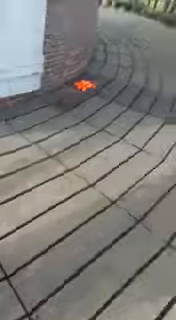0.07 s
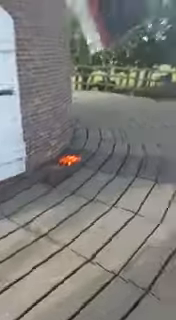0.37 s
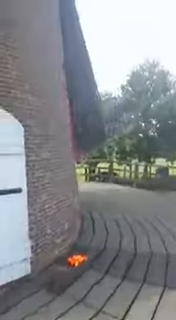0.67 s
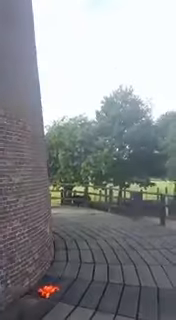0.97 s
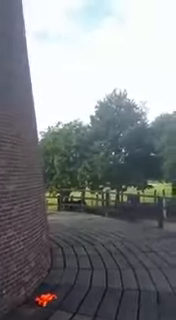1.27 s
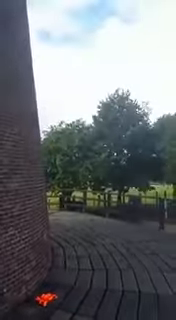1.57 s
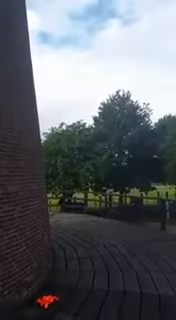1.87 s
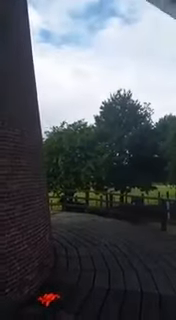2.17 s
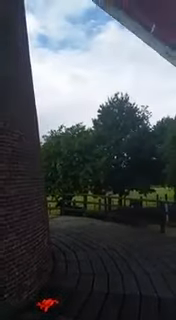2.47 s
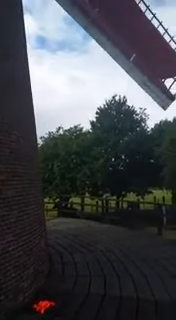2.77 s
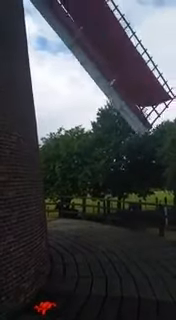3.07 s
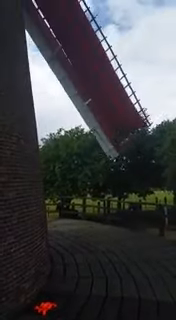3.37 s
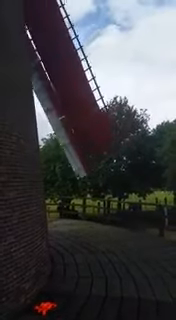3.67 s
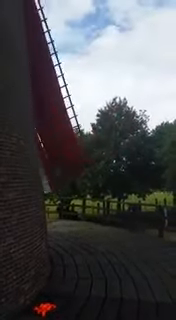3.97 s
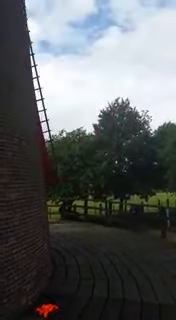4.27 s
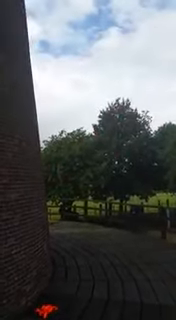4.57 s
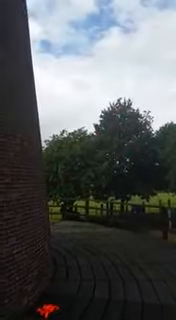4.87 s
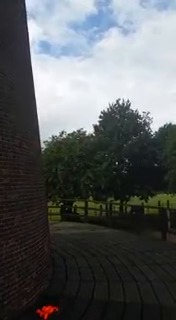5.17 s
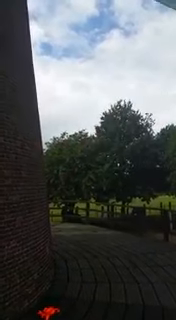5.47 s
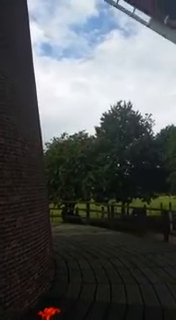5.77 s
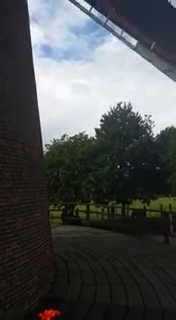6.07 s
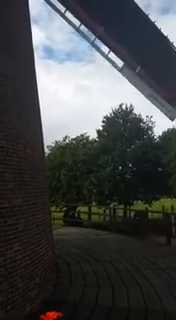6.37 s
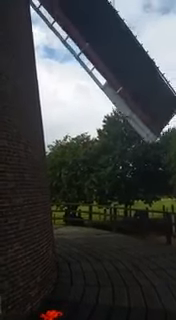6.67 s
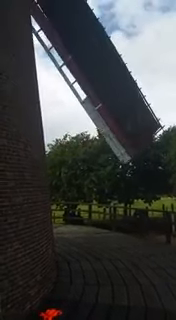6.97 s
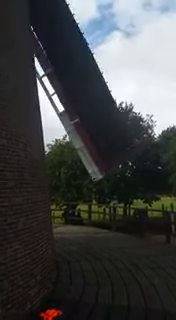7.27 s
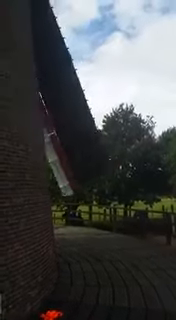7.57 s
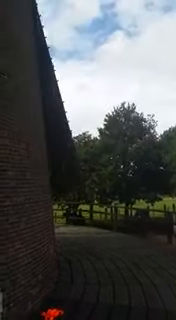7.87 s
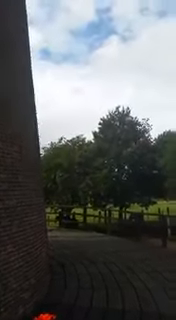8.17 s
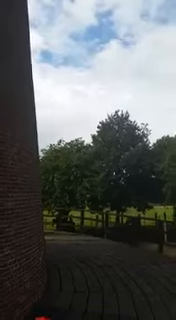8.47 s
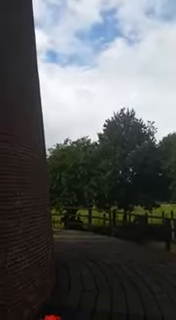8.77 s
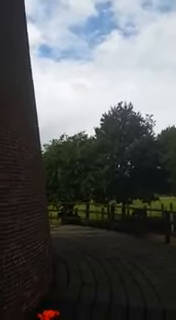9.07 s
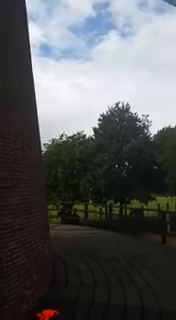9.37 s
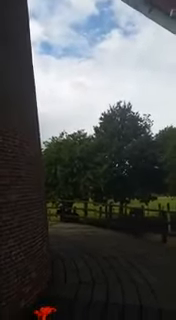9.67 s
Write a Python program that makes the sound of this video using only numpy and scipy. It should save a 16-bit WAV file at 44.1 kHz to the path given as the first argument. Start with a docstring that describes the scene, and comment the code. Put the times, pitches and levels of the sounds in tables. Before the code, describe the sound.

After a brief silence, fingers rub, tick and thump on the left of a phone microphone at about 0.5 seconds, and outdoor wind starts. By 2 seconds it has built into a steady, pattering low rumble with a throbbing hum, a higher fluttering whirr and a thin hiss. Dull knocks and tiny creaks are scattered throughout, with a sharp, close thump near 2.9 seconds. Very faint, high insect-like trills come and go toward the right. A windmill sail pushes a deep swell of air past at about 3.8 seconds and again at 7.3, and soft low booms swell between 3.5 and 5 seconds. From 8.2 seconds the fingers return, loudly thumping, rubbing and scraping right on the microphone, mostly on the left, with small ticks and heavier low gusts until the end, just before 10 seconds.

```python
"""Beside a turning windmill, a phone held in the hand, two microphone ports open to the wind.
After a moment of silence fingers rub, tick and thump at the left port; dull knocks, faint high chirps
and brief narrow rings come and go. By 2 s the buffeting has built to a pattering rumble that hums in the
case, with a higher whirr, low gusts and a thin hiss. Near 3.8 s and 7.3 s a sail pushes a deep swell
of air past. From 8.2 s the fingers are back, thumping, rubbing and scraping right on the microphone."""
import sys
import numpy as np
from scipy import signal
from scipy.fft import rfft, irfft
from scipy.io import wavfile
from scipy.ndimage import uniform_filter1d

SR = 44100
rng = np.random.default_rng(int(sys.argv[2]) if len(sys.argv) > 2 else 0)


def materialize(psi):
    """Save the field psi as 16-bit PCM at rate SR to the path in sys.argv[1].

    A 1-D psi becomes a single channel; in a 2-D psi each row is a channel.
    """
    bounded = np.clip(np.atleast_2d(psi).T, -1, 1)
    quanta = np.round(bounded * 32767).astype(np.int16)
    wavfile.write(sys.argv[1], SR, quanta)


N = 428652
TIME = np.arange(N) / SR
FULL_WIND_DB = -29  # usual strength of the buffeting


def undb(db):
    """Decibels to gain."""
    return 10 ** (np.asarray(db) / 20)


def unit(x):
    """Scale to rms 1."""
    return x / np.sqrt(np.mean(x ** 2))


def bell(s, half_s):
    """A smooth swell that peaks at 1 at time s."""
    return np.exp(-((TIME - s) / half_s) ** 2)


def sides(pan_db):
    """Gains at the two microphones; pan is left minus right."""
    return undb([[min(pan_db, 0)], [min(-pan_db, 0)]])


def add(out, s, sound, pan_db):
    """Mix a sound in at time s."""
    start = int(s * SR)
    part = sound[:max(N - start, 0)]
    out[:, start:start + len(part)] += sides(pan_db) * part


def across(points, hz):
    """Read (f/Hz, value) points on a log-frequency axis."""
    f, value = np.transpose(points)
    return np.interp(np.log(hz + 1), np.log(f), value)


def colour(x, points, resonances=(), size=16384):
    """Minimum-phase filter: a smooth spectrum with ringing resonances on top."""
    hz = np.arange(size // 2 + 1) * SR / size
    peaks_db = sum(lift / (1 + (2 * (hz - f) / width) ** 2) for f, width, lift in resonances)
    cepstrum = irfft(np.log(undb(across(points, hz) + peaks_db)))
    cepstrum[1:size // 2] *= 2
    cepstrum[size // 2:] = 0
    response = irfft(np.exp(rfft(cepstrum)))[:size // 2]
    return signal.oaconvolve(x, response)[:len(x)]


def band(x, hz, width_hz):
    """Two-pole resonance."""
    return signal.lfilter(*signal.iirpeak(hz, hz / min(width_hz, SR / 4), fs=SR), x)


def shelf(x, db, corner_hz):
    """Shift everything above the corner by db."""
    low = signal.sosfiltfilt(signal.butter(2, corner_hz, fs=SR, output="sos"), x)
    return low + undb(db) * (x - low)


def walk(rate):
    """Random levels held 1 / rate s and smoothed twice; rms near 1."""
    hold = int(SR / rate)
    steps = np.repeat(rng.standard_normal(N // hold + 1), hold)
    return unit(uniform_filter1d(uniform_filter1d(steps, hold), hold)[:N])


def grains(rate, spread_db):
    """Random clicks, rate a second, of uneven size; rms 1."""
    size = undb(spread_db * np.minimum(rng.exponential(size=N), 4))
    return unit((rng.random(N) < rate / SR) * size * rng.standard_normal(N))


def ringing(hz, width_hz):
    """Noise in a steep resonance; rms 1."""
    return unit(band(band(rng.standard_normal(N), hz, width_hz), hz, width_hz))


def swell(length_s, hz, width_hz):
    """Resonant noise that rises and falls once."""
    shape = signal.windows.cosine(int(length_s * SR))
    return unit(ringing(hz, width_hz)[:len(shape)]) * shape


def pulsing(rate_hz, unevenness, depth_db):
    """A gain that pulses at an uneven rate; rms 1."""
    phase = 2 * np.pi * np.cumsum(rate_hz * (1 + unevenness * walk(rate=30))) / SR
    return unit(undb(depth_db * np.sin(phase)))


# buffeting at the phone: t/s, level/dB
WIND_STRENGTH = [(.38, -59), (.46, -64), (.51, -45.5), (.64, -43), (1.28, -40.5), (1.43, -37),
                 (1.62, -31.5), (1.82, -29.5), (4.4, -28), (7.3, -29.5), (8.5, -28.5), (9.72, -28.5)]


def wind_strength():
    """The wind rises, then holds; this one level in dB drives all its layers."""
    return np.interp(TIME, *np.transpose(WIND_STRENGTH))


# wind on the body of the phone: f/Hz, level/dB
RUMBLE_SPECTRUM = [(15, -41.5), (40, -12.5), (70, -4.5), (100, 0), (200, -2.5), (280, -5), (400, -9),
                   (500, -14.5), (640, -21.5), (1000, -25.5), (1600, -35), (2400, -40.5), (3500, -46.5),
                   (6000, -65.5)]
# resonances of the case in the hand: f/Hz, width/Hz, lift/dB
CASE_MODES = [(89, 12, 6), (145, 20, 1.5), (182, 8.4, 6), (210, 12, 3.5), (318, 40, 3), (403, 18, 4),
              (744, 97, 7.5), (997, 40, 7), (1160, 45, 2.5), (1243, 55, 8.5), (1722, 90, 7)]
# likeness of the rumble at the two microphones: f/Hz, correlation
PORT_CORRELATION = [(40, 0.98), (90, 1), (170, 0.99), (240, 0.63), (330, 0.92), (430, 0.58), (600, 0.43),
                    (800, 0.2), (1000, -0.21), (1350, -0.78), (1600, -0.33), (2000, 0.0035)]


def rumble(strength_db, patter=0.43):
    """Eddies and tiny taps shake the case: low notes move both ports together, higher ones rock it."""
    flutter, flurry = undb(0.82 * walk(rate=15)), undb(2 * walk(rate=12))
    likeness = np.clip(across(PORT_CORRELATION, np.arange(N // 2 + 1) * SR / N), -1, 1)
    motions = []
    for sign in (1, -1):
        push = flutter * rng.standard_normal(N) + patter * flurry * grains(rate=350, spread_db=2.5)
        share = irfft(rfft(push) * np.sqrt(1 + sign * likeness), N)
        motions.append(colour(share, RUMBLE_SPECTRUM, CASE_MODES))
    together, rocking = motions
    shaking = unit(np.array([together + rocking, together - rocking])) * undb(strength_db)
    # a light wind carries fewer small eddies, so it sounds duller
    return shelf(shaking, np.minimum(strength_db - FULL_WIND_DB, 0), corner_hz=1250)


# two close modes of the case: f/Hz, width/Hz, level/dB
HUMMING_MODES = [(325.1, 18.2, -1.5), (348.9, 25.5, -4.5)]
# throbs and lulls of the hum: peak t/s, half-length/s, lift/dB
HUM_THROBS = [(0.573, 0.036, -11), (1.494, 0.15, 4.5), (2, 0.029, 8.5), (2.16, 0.05, -5),
              (2.277, 0.036, 3.5), (2.54, 0.054, 5.5), (2.794, 0.031, 4.5), (3.328, 0.03, -7),
              (3.616, 0.027, 7.5), (4.026, 0.027, -9), (4.17, 0.08, 6.5), (4.62, 0.087, 5),
              (5.033, 0.019, 4.5), (5.4, 0.044, 8), (5.518, 0.09, 4), (5.718, 0.08, 6.5), (6.04, 0.024, -7),
              (6.187, 0.03, 8), (6.507, 0.023, -11), (7.067, 0.039, 3), (7.7, 0.32, -3.5),
              (8.175, 0.033, -10), (9.21, 0.049, 3.5)]


def hum(strength_db, wander_hz=3, calm_db=-27, rocking_db=-13, pan_db=-1.5):
    """The case hums, fluttering and throbbing: a firm tone in light wind, two noisy modes as it grows."""
    ring, rocking = (unit(sum(undb(db) * ringing(hz, width) for hz, width, db in HUMMING_MODES))
                     for _ in range(2))
    pitch_hz = HUMMING_MODES[0][0] + wander_hz * walk(rate=9)
    tone = unit(np.sin(2 * np.pi * np.cumsum(pitch_hz) / SR))
    excess_db = strength_db - FULL_WIND_DB
    ring_gain = undb(-7 + 1.15 * excess_db)
    tone_gain = np.hypot(undb(calm_db), undb(-8 + 0.91 * excess_db))
    together = ring_gain * ring + tone_gain * tone
    # the wind sets the slow swells, while the quick beating stays random
    together *= np.hypot(ring_gain, tone_gain) / np.sqrt(uniform_filter1d(together ** 2, SR // 6))
    together *= pulsing(rate_hz=9, unevenness=0.398, depth_db=0.8)
    throb_db = sum(db * bell(s, half_s) for s, half_s, db in HUM_THROBS) + 0.5 * walk(rate=16)
    opposite = np.array([[1], [-1]])
    apart = opposite * undb(rocking_db) * ring_gain * rocking
    return (together + apart) * undb(FULL_WIND_DB + throb_db + opposite * pan_db / 2)


def whirr(strength_db, wander_hz=11, gain_db=-22, growth=1.45):
    """A higher whirr grows with the buffeting, fluttering unevenly while its pitch wanders."""
    drift = np.exp(2j * np.pi * np.cumsum(wander_hz * walk(rate=10)) / SR)
    note = np.real(signal.hilbert(ringing(hz=750, width_hz=32)) * drift)
    level_db = FULL_WIND_DB + growth * (strength_db - FULL_WIND_DB) + gain_db + 2.5 * walk(rate=7.2)
    flutter = pulsing(rate_hz=14, unevenness=0.35, depth_db=4.5)
    return sides(pan_db=1) * note * flutter * undb(level_db)


# swirling air right at the ports: f/Hz, level/dB
EDDY_SPECTRUM = [(10, -17), (25, -12.5), (45, -0.5), (80, 0), (140, -8), (300, -20), (1000, -75)]
# low gusts on the microphones: peak t/s, half-length/s, level/dB, pan/dB
PORT_GUSTS = [(0.618, 0.097, -37.5, 22), (1.06, 0.25, -33.5, -18), (1.483, .14, -33.5, 13),
              (2.25, .25, -41, 0.5), (2.93, .2, -38, 13), (5.87, 0.1, -39.5, -10), (7.354, 0.17, -29, -12),
              (7.75, 0.2, -34, 1.5), (8.36, 0.24, -25, -1.5), (8.867, 0.29, -26.5, -3),
              (9.6, 0.54, -26.5, 12)]


def eddies(strength_db, steady_db=-21, flutter_db=2):
    """Slow swirls push on each port separately: weakly with the buffeting, strongly in each gust."""
    swirls = [colour(rng.standard_normal(N), EDDY_SPECTRUM) * undb(flutter_db * walk(rate=7.8))
              for _ in range(2)]
    gusts = sum(undb(db) * sides(pan_db) * bell(s, half_s) for s, half_s, db, pan_db in PORT_GUSTS)
    return unit(np.array(swirls)) * np.hypot(undb(strength_db + steady_db), gusts)


def sails(strength_db, pass_s=3.84, period_s=3.47, gain_db=-4):
    """Each sail pushes a deep swell as it sweeps down to the tower; the first is lost in the fade-in."""
    passes = sum(bell(pass_s + k * period_s, half_s=0.28) for k in (-1, 0, 1))
    return ringing(hz=95, width_hz=90) * passes * undb(strength_db + gain_db)


# air across the microphone ports: f/Hz, level/dB
HISS_SPECTRUM = [(800, -19.5), (2000, 5.5), (3000, 5.5), (4400, 7), (5400, -5.5), (7200, -7), (9000, -12),
                 (10500, 1), (13000, 1.5), (16000, 0)]
# resonances of each port: f/Hz, width/Hz, lift/dB
LEFT_PORT_MODES = [(3826, 1280, 20.5), (11900, 1500, 1)]
RIGHT_PORT_MODES = [(4300, 2400, 6.5), (11470, 2300, 11.7)]
# surges of the treble: peak t/s, half-length/s, lift at the right microphone/dB
HISS_SURGES = [(0.576, 0.09, 32), (1.65, 0.018, 7.5), (1.778, 0.017, 7.5), (2.161, 0.018, 12),
               (3.044, 0.018, 11), (3.1, 0.02, 7), (3.42, 0.016, 5), (4.655, 0.023, 5.5), (5.12, .04, 4.5),
               (5.45, 0.049, 9), (6.06, 0.0099, 6), (6.27, 0.025, 6), (8.497, 0.37, 3)]


def hiss(strength_db, lower_db=-58, treble_db=-55, hold_above_db=-32, left_share=0.35):
    """Wind sounds each port's resonances: the lower grow with it; the treble sets in steeply, surging."""
    ports = unit(np.array([colour(rng.standard_normal(N), HISS_SPECTRUM, modes)
                           for modes in (LEFT_PORT_MODES, RIGHT_PORT_MODES)]))
    lower = signal.sosfiltfilt(signal.butter(6, 5200, fs=SR, output="sos"), ports)
    onset_db = 3.5 * np.minimum(strength_db - hold_above_db, 0)
    surge_db = sum(db * bell(s, half_s) for s, half_s, db in HISS_SURGES) + 1.7 * walk(rate=12)
    treble = (ports - lower) * undb(treble_db + onset_db + np.array([left_share * surge_db, surge_db]))
    lower_gain = undb(lower_db + 1.72 * (strength_db - FULL_WIND_DB))
    flicker = undb(0.5 * walk(rate=23))
    return (lower * lower_gain + treble) * flicker


# skin sliding on the port, and its bright sizzle: f/Hz, level/dB
SKIN_SPECTRUM = [(200, -26), (600, 19.5), (1500, 2), (3000, -5), (4000, 4), (5200, -26), (8000, -28)]
SIZZLE_SPECTRUM = [(3000, -29.5), (5500, -10), (7500, -3), (9500, -4.5), (12000, 8), (16000, -11)]
# fingers right on the left microphone: t/s, length/s, level/dB, f/Hz, width/Hz, relative sizzle/dB
FINGER_RUBS = [(0.382, 0.095, -72.5, 1710, 1800, -19), (0.491, 0.078, -51.5, 1640, 2500, -29),
               (0.558, 0.06, -54.5, 2400, 2600, -24.5), (0.578, 0.19, -68, 2400, 2400, -19),
               (0.684, 0.35, -73, 2000, 2410, -28), (0.88, 0.0047, -60, 2670, 2000, -28),
               (2.921, 0.0074, -43, 2680, 2400, -30), (8.22, 0.017, -41, 1990, 2420, -22),
               (8.264, 0.024, -45, 2200, 2600, -14), (8.507, 0.16, -45.5, 2580, 2600, -20),
               (8.771, 0.022, -29.5, 2040, 2000, -26), (8.777, 0.01, -22, 1190, 2780, -21),
               (8.781, 0.006, -31.5, 3670, 1200, -14), (8.885, 0.097, -34.5, 1600, 1900, -26),
               (8.913, 0.69, -49, 2320, 2810, -17), (9.0, 0.075, -53, 3360, 2010, -22),
               (9.229, 0.13, -43, 2160, 2500, -22), (9.428, 0.23, -54, 2850, 2600, -9)]


def rubs(taper=0.48, pan_db=24):
    """Skin sticks and slips over the left port in dense tiny clicks."""
    out, slips = np.zeros((2, N)), grains(rate=5000, spread_db=1)
    body, sizzle = colour(slips, SKIN_SPECTRUM), colour(slips, SIZZLE_SPECTRUM)
    for s, length, db, hz, width_hz, sizzle_db in FINGER_RUBS:
        span = slice(int(s * SR), int((s + length) * SR))
        friction = band(band(body[span], hz, width_hz), hz, width_hz)
        stroke = unit(friction) + undb(sizzle_db) * unit(sizzle[span])
        add(out, s, undb(db) * stroke * signal.windows.tukey(len(stroke), taper), pan_db)
    return out


# ticks close up, mostly on the left: t/s, peak level/dB, pan/dB
PORT_TICKS = [(0.463, -43, 25), (8.607, -36, -18), (9.072, -44, 6), (9.408, -41, 10), (9.487, -38, 16),
              (9.525, -44, 10), (9.585, -50, 10), (9.683, -39, 8)]


def ticks(decay_s=0.00053):
    """Tiny bright clicks at the ports."""
    out, t = np.zeros((2, N)), TIME[:SR // 50]
    for s, db, pan_db in PORT_TICKS:
        click = colour(rng.standard_normal(len(t)) * np.exp(-t / decay_s), SIZZLE_SPECTRUM)
        add(out, s, undb(db) * click / np.abs(click).max(), pan_db)
    return out


# jolts right on the left microphone:
# t/s, peak level/dB, push +1 or pull -1, swing f/Hz, damping (width / f), cutoff f/Hz, scuff gain/dB
FINGER_THUMPS = [(0.4637, -13.5, 1, 76.5, 1.03, 3100, -43), (0.8796, -17, -1, 190, 0.53, 1400, -46),
                 (2.9177, -6, -1, 137, 0.33, 1300, -36), (8.2225, -6, -1, 121, 0.64, 527, -31),
                 (8.545, -3.5, 1, 162, 0.53, 2100, -34), (8.786, -13.5, 1, 98, 0.42, 350, -27),
                 (8.915, -13, -1, 227, 0.36, 800, -37), (9.6698, -7, 1, 149, 0.89, 350, -32)]


def thumps(pan_db=26, scuff_s=0.046):
    """A finger jolts the air in the port with a tiny scuff; the pressure leaks away and swings back."""
    out, t = np.zeros((2, N)), TIME[:SR // 10]
    for s, db, direction, swing_hz, damping, edge_hz, scuff_db in FINGER_THUMPS:
        pulse = band(signal.unit_impulse(len(t)), swing_hz, damping * swing_hz)
        pulse = signal.sosfilt(signal.butter(4, edge_hz, fs=SR, output="sos"), pulse)
        pulse = signal.sosfilt(signal.butter(1, 45, "high", fs=SR, output="sos"), pulse)
        jolt = direction * pulse / np.abs(pulse).max()
        scuff = colour(rng.standard_normal(len(t)) * np.exp(-t / scuff_s), SKIN_SPECTRUM)
        add(out, s, undb(db) * (jolt + undb(scuff_db) * scuff), pan_db)
    return out


# knocks heard through the case, near centre: t/s, peak level/dB, f/Hz
DULL_KNOCKS = [(0.708, -42, 684), (1.233, -41, 710), (1.357, -41, 705), (1.81, -27.5, 595),
               (1.848, -37, 501), (1.92, -34, 727), (3.136, -30, 600), (3.283, -36, 708), (4.521, -31, 740),
               (4.743, -36, 743), (5.604, -38, 501), (5.693, -35, 576), (6.001, -37, 713),
               (6.583, -32, 800), (7.449, -33, 708), (7.501, -28, 686)]


def knocks(rattle=0.052, rattle_s=0.0081):
    """Short dull taps, each with its own pitch and a little rattle, ring the case."""
    out, t = np.zeros((2, N)), TIME[:SR // 10]
    dullness = [(300, 9.5), (800, -0.5), (1500, -9.5), (4000, -30.0)]  # f/Hz, level/dB
    for s, db, hz in DULL_KNOCKS:
        blow = signal.unit_impulse(len(t)) + rattle * rng.standard_normal(len(t)) * np.exp(-t / rattle_s)
        tap = colour(band(blow, hz, width_hz=320), dullness, CASE_MODES)
        add(out, s, undb(db) * tap / np.abs(tap).max(), pan_db=2)
    return out


# thin chirps off to the right: t/s, length/s, level/dB, f/Hz
HIGH_CHIRPS = [(0.848, 0.84, -88, 12200), (1.6, 0.33, -85, 8340), (3.324, 0.84, -63.5, 12040),
               (4.133, 0.21, -77, 8300), (4.32, 0.14, -75, 8300), (6.047, 0.8, -60, 12040),
               (6.904, 0.58, -76, 8300), (9.197, 0.59, -63, 12200)]


def chirps(relative_width=0.026):
    """Faint, grainy insect-like trills fade in and out in quick, uneven pulses."""
    out = np.zeros((2, N))
    for s, length, db, hz in HIGH_CHIRPS:
        call = swell(length, hz, relative_width * hz)
        add(out, s, undb(db) * call * signal.windows.cosine(len(call)), pan_db=-6)
    return out * pulsing(rate_hz=48, unevenness=0.35, depth_db=7)


# brief rings, from near centre to hard left: t/s, length/s, level/dB, f/Hz, pan/dB
NARROW_RINGS = [(1.229, 0.048, -54, 730, 2), (1.997, 0.045, -45.5, 725, -2), (3.274, 0.023, -34.5, 695, 5),
                (5.1, 0.094, -55, 1460, 3), (5.434, 0.046, -40.5, 736, 0), (5.996, 0.04, -43, 690, -2),
                (6.575, 0.035, -45.5, 1140, 7), (8.717, 0.027, -35.5, 714, 9),
                (8.777, 0.0146, -26, 1164, 27)]


def narrow_rings():
    """Brief, narrow resonances: most creak; the one near 5.1 s rings faintly within a soft swish."""
    out = np.zeros((2, N))
    for s, length, db, hz, pan_db in NARROW_RINGS:
        add(out, s, undb(db) * swell(length, hz, width_hz=140), pan_db)
    return out


# booms of the case, alike at both microphones: t/s, length/s, level/dB, f/Hz
CASE_BOOMS = [(1.7, 0.18, -34.5, 160), (3.52, 0.47, -35.5, 161), (4.0, 0.48, -32.5, 181),
              (4.08, 0.2, -31.5, 92), (4.47, 0.21, -33, 90), (4.63, 0.24, -28.5, 182)]


def booms():
    """Now and then the wind catches a low mode of the case and it swells."""
    out = np.zeros((2, N))
    for s, length, db, hz in CASE_BOOMS:
        add(out, s, undb(db) * swell(length, hz, width_hz=22), pan_db=0)
    return out


# air passing the phone, centre: t/s, length/s, level/dB, f/Hz
AIR_SWISHES = [(2.423, 0.11, -53.5, 1600), (4.992, 0.35, -51, 870), (6.564, 0.052, -51, 1100)]


def swishes():
    """Air sweeps past in a broad, dull swell."""
    out = np.zeros((2, N))
    for s, length, db, hz in AIR_SWISHES:
        add(out, s, undb(db) * swell(length, hz, width_hz=1300), pan_db=0)
    return shelf(out, db=-24, corner_hz=3200)


# a scraping finger, close up: f/Hz, level/dB
SCRAPE_SPECTRUM = [(700, -17), (1400, -7), (1650, -2.5), (2700, -3), (3200, -5), (4000, -8), (4600, -20),
                   (5500, -29), (9000, -57)]
# resonances of the gap under it: f/Hz, width/Hz, lift/dB
GAP_MODES = [(1720, 190, 10), (2200, 150, 3), (2440, 120, 7.5), (2670, 110, 5.5), (3710, 160, 10),
             (4000, 240, 3)]
# scrapes at the left microphone: t/s, length/s, level/dB, relative sizzle/dB
FINGER_SCRAPES = [(8.429, 0.067, -33.5, -18.5), (8.475, 0.055, -32, -26), (9.261, 0.038, -38.5, -17)]


def scrapes(taper=0.8, pan_db=24, grit_db=1):
    """A finger catches and slips in uneven jerks that ring the gap under it."""
    out = np.zeros((2, N))
    slips = grains(rate=2600, spread_db=0.6) * undb(grit_db * walk(rate=300))
    body, sizzle = colour(slips, SCRAPE_SPECTRUM, GAP_MODES), colour(slips, SIZZLE_SPECTRUM)
    for s, length, db, sizzle_db in FINGER_SCRAPES:
        span = slice(int(s * SR), int((s + length) * SR))
        stroke = unit(body[span]) + undb(sizzle_db) * unit(sizzle[span])
        add(out, s, undb(db) * stroke * signal.windows.tukey(len(stroke), taper), pan_db)
    return out


def scene(start_s=0.38, fade_s=0.024):
    """Beside the mill the wind starts after a moment of silence; the short sounds lie on top."""
    fade = np.clip((TIME - start_s) / fade_s, 0, 1)
    strength_db = wind_strength()
    wind = sum(layer(strength_db) for layer in (rumble, hum, whirr, eddies, sails, hiss))
    background = fade * wind + booms() + swishes() + chirps()
    return background + thumps() + knocks() + ticks() + rubs() + scrapes() + narrow_rings()


def record(dry):
    """The phone cuts the treble steeply above 15850 Hz."""
    return signal.sosfilt(signal.ellip(10, .2, 70, 15850, fs=SR, output="sos"), dry)


dry = scene()
out = record(dry)
materialize(out)
```